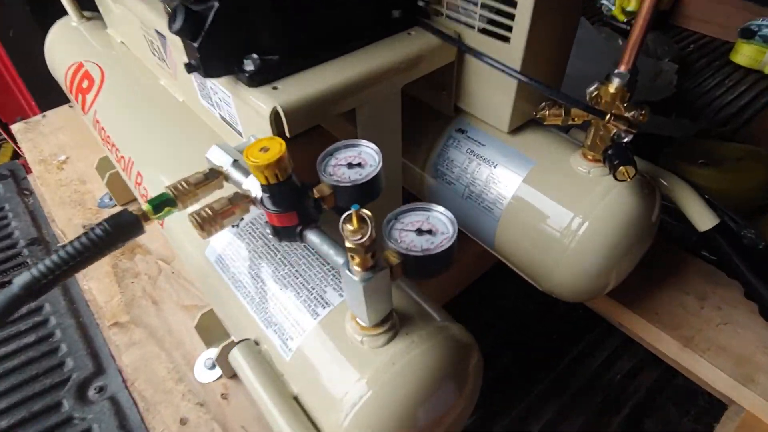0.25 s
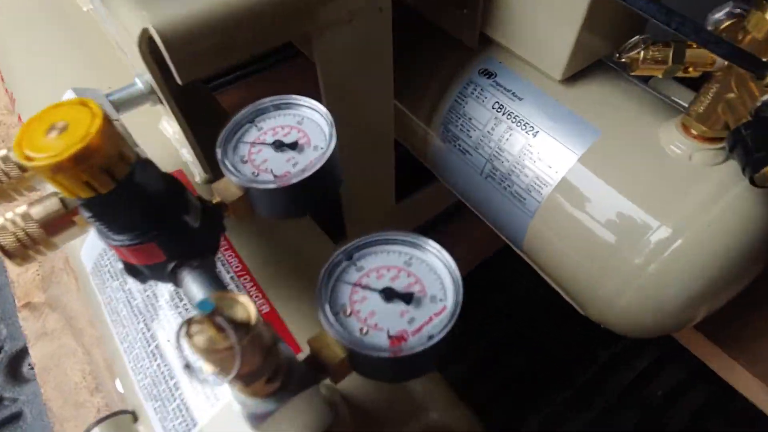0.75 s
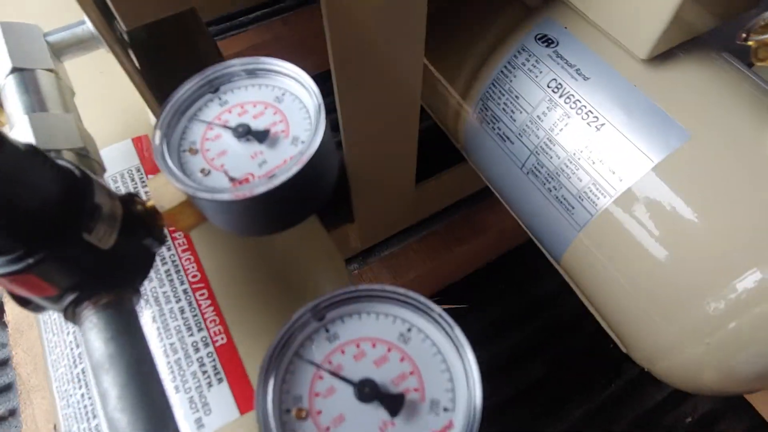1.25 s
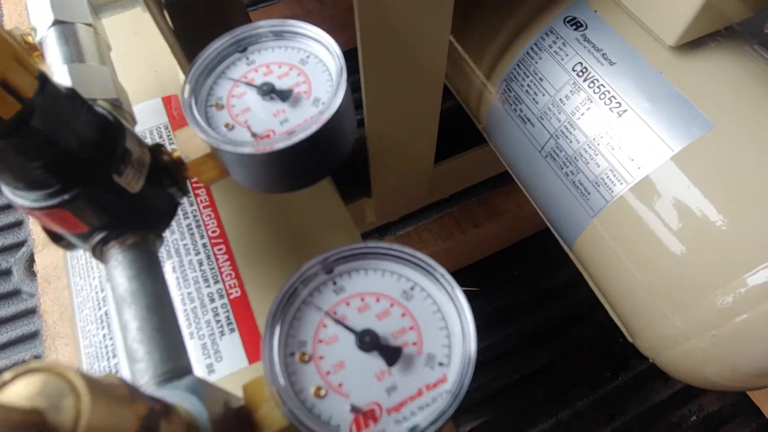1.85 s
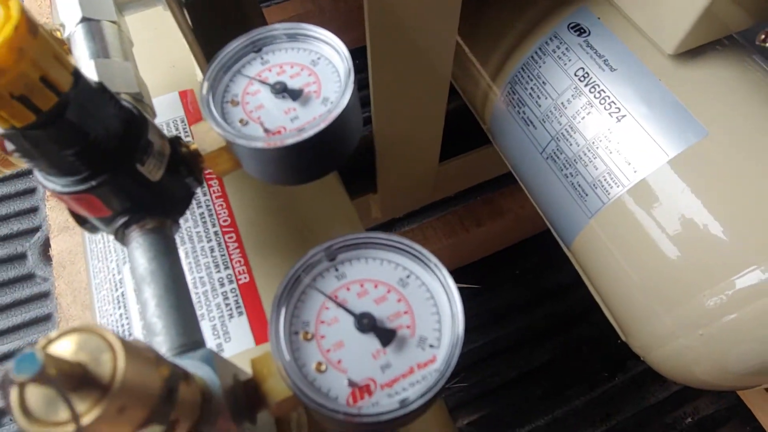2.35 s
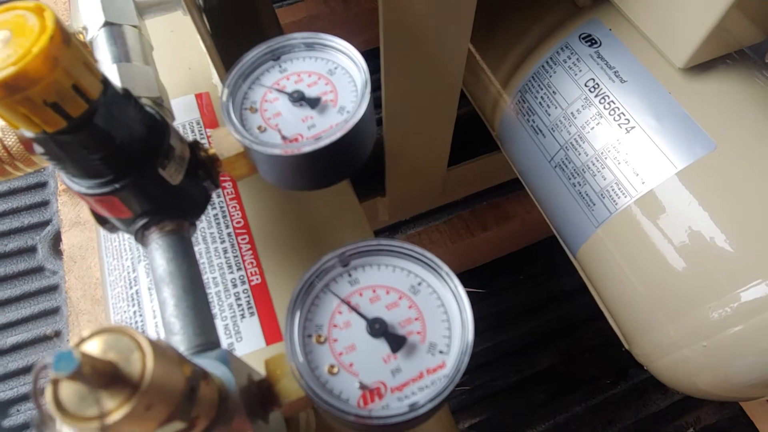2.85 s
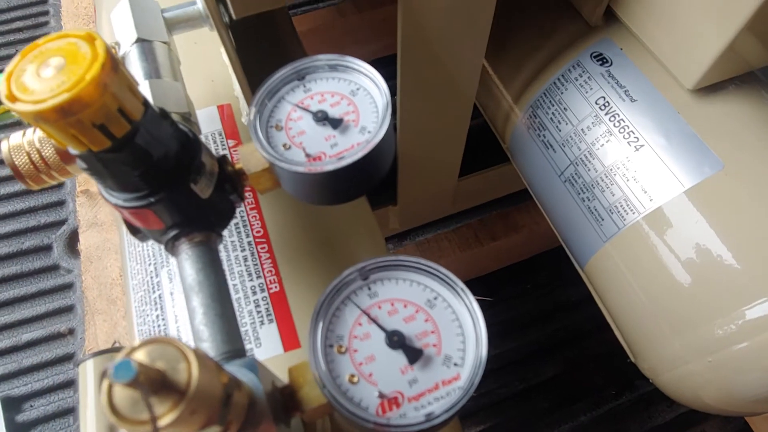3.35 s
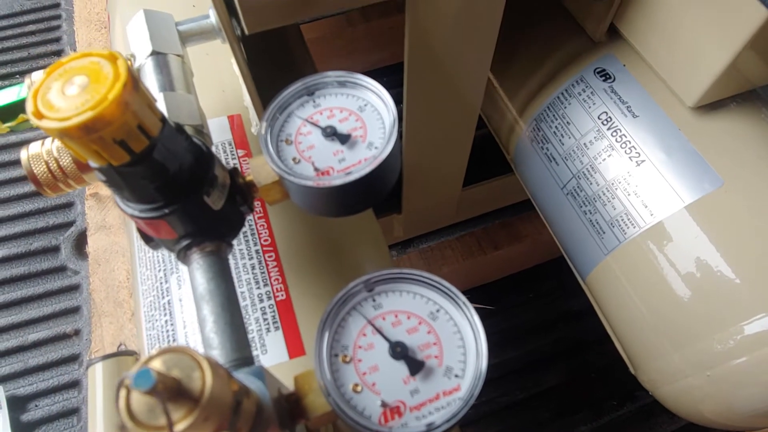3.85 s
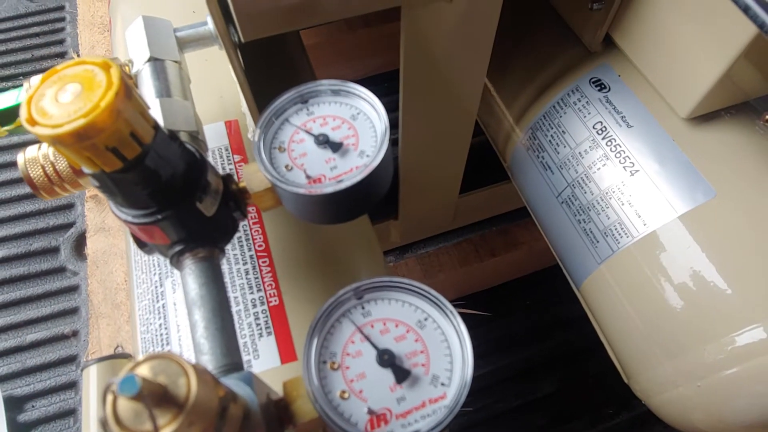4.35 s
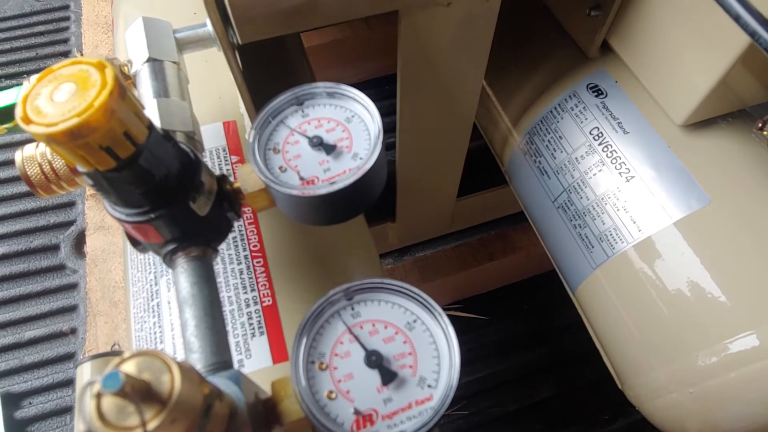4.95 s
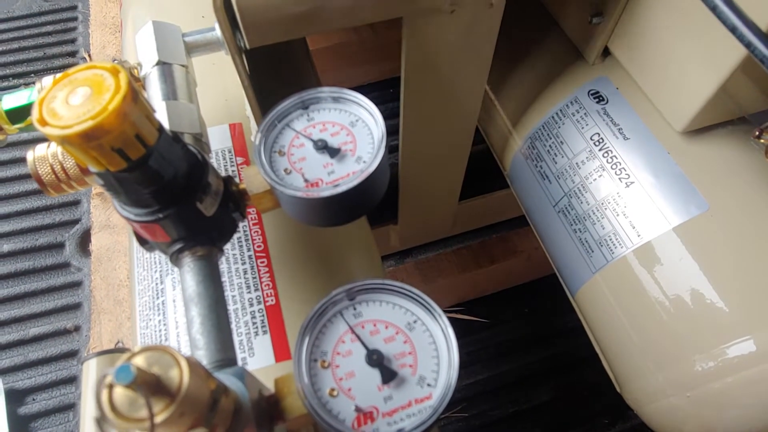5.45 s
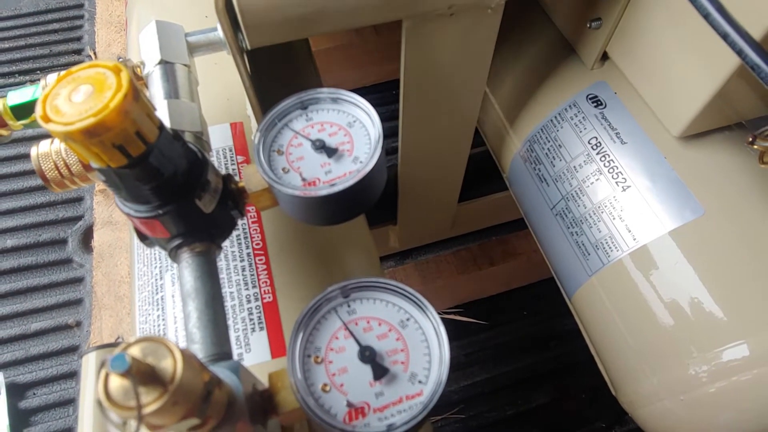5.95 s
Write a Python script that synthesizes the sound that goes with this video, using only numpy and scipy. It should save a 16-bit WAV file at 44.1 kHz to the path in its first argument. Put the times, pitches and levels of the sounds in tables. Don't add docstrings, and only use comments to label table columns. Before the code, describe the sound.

Loud, unbroken drone of a petrol-driven air compressor, rapid exhaust pulses and pump strokes beating together over roaring gas and harsh metallic clatter.

```python
import sys
import numpy as np
from scipy import signal
from scipy.io import wavfile
from scipy.ndimage import uniform_filter1d, minimum_filter1d

SR = 44100
rng = np.random.default_rng(int(sys.argv[2]) if len(sys.argv) > 2 else 0)


def convert_level_to_amplitude(level_db):
    exponent = np.asarray(level_db, float) / 20
    return 10 ** exponent


def put_to_file(sound):
    columns = np.atleast_2d(sound).T
    safe = np.clip(columns, -1, 1)
    whole_steps = np.round(safe * 32767)
    wavfile.write(sys.argv[1], SR, whole_steps.astype(np.int16))


N = 274302

STEP = 8
BELT = .736215


def evened(x):
    return x / np.sqrt(np.mean(x ** 2) + 1e-20)


def read(points, hz):
    f, value = np.transpose(points)
    return np.interp(np.log(hz + 1), np.log(f + 1), value)


def curve(rows):
    time_s, value = np.transpose(rows)
    return np.interp(np.arange(N) / SR, time_s, value)


def slow(rate_hz, count=N):
    knots = signal.resample(rng.standard_normal(60), 600)
    end = min(rate_hz * N / SR * 20, 599)
    return evened(np.interp(np.linspace(0, end, count), np.arange(600), knots))


def panned(pan_db):
    return convert_level_to_amplitude([[pan_db / 2], [-pan_db / 2]])


# (time [s], firing rate [1/s])
FIRING_RATE = [
    (0.0, 28.587),
    (0.4, 28.567),
    (1.0, 28.515),
    (1.75, 28.593),
    (3.15, 28.45),
    (4.0, 28.553),
    (5.2, 28.574),
    (6.22, 28.515),
]


def angles():
    firings = np.cumsum(curve(FIRING_RATE)) / SR
    return 2 * np.pi * (firings - .472), 2 * np.pi * (BELT * firings + .0775)


def shaft_beat(engine, pump):
    return 3 * engine - 4 * pump


def knock(engine, pump, fire_db, stroke_db):
    fire = np.exp(0.52 * (np.cos(engine + 5.84) - 1))
    stroke = np.exp(0.89 * (np.cos(2 * pump + 3.44) - 1))
    meeting_db = 6.3 * (fire * stroke - 0.2135)
    return convert_level_to_amplitude(fire_db * fire + stroke_db * stroke + meeting_db)


# (frequency [Hz], correlation [-1..1])
PORT_LIKENESS = [(60, 0.51), (140, 0.81), (330, 0.8), (500, 0.63), (770, 0.74), (1150, 0), (2000, 0)]


def shaped(drive, spectra, patchy_db):
    hz, _, (a, b) = signal.stft(drive, SR, nperseg=1024, noverlap=768)
    patches = uniform_filter1d(rng.standard_normal(a.shape), 12, axis=0)
    patches = evened(uniform_filter1d(patches, 14, axis=1))
    same = np.clip(read(PORT_LIKENESS, hz), -1, 1)[:, None]
    ports = np.array([a, same * a + np.sqrt(1 - same ** 2) * b])
    ports *= convert_level_to_amplitude(patchy_db * patches)
    ports *= convert_level_to_amplitude([read(s, hz) for s in spectra])[:, :, None]
    return signal.istft(ports, SR, nperseg=1024, noverlap=768)[1][:, :N]


# (frequency [Hz], left minus right [dB])
BASS_PAN = [(40, 4), (90, 4), (150, 2.5), (400, 0.5), (700, 2)]


def bass_pan_db(hz):
    return read(BASS_PAN, hz)


# (frequency [Hz], density [dB per Hz])
ROAR_SPECTRUM = [(25, -25), (50, -21), (80, -12), (130, -7), (250, -8), (500, -10), (900, -10)]


def roar(engine, pump):
    drive = rng.standard_normal((2, N)) * knock(engine, pump, fire_db=0.8, stroke_db=-1.06)
    left = list(ROAR_SPECTRUM) + [(1300, -35.5), (3000, -73)]
    right = [(hz, db - bass_pan_db(hz)) for hz, db in left]
    return convert_level_to_amplitude(3.5) * shaped(drive, [left, right], patchy_db=-0.5)


def blows(angle, uneven):
    hit = np.diff(np.floor(angle / (2 * np.pi)), prepend=0) > 0
    return evened(hit * (1 + uneven * rng.standard_normal(N)))


# (frequency [Hz], width [Hz], level [dB], left minus right [dB])
PANELS = [(751, 12, -29.5, -1), (1090, 30, -31, -1), (1135, 9, -38, 5), (1159, 7, -30, 3),
          (1205, 30, -34, 4),
          (1278, 14, -34, 1), (1370, 16, -38, 0), (1455, 25, -36, 5), (1630, 30, -34, -9),
              (1738, 30, -27.5, -6),
          (1810, 50, -36, -9), (1975, 30, -38, -8), (2148, 26, -32, -10), (2225, 18, -35.5, -9),
              (2375, 20, -42, -8), (2515, 20, -42, -4), (2883, 30, -34, 0),
          (2680, 40, -42, 2), (3290, 40, -43, 3), (3690, 40, -44, 3), (4190, 50, -45, 3),
               (4970, 50, -47, -2), (5230, 50, -46, 2), (6000, 60, -46, 2)]
# (time [s], lean [0-1])
LEAN = [
    (0.0, 0.05),
    (0.6, 0.46),
    (1.3, 1.0),
    (1.9, 0.9),
    (2.5, 0.7),
    (2.9, 0.25),
    (3.4, 0.4),
    (4.5, 0.2),
    (6.22, 0.0),
]


def panels(engine, pump):
    shake = rng.standard_normal((2, N)) * knock(engine, pump, fire_db=1.5, stroke_db=-4.5)
    drive = evened(shake) + 0.38 * blows(pump, uneven=0.11) + 0.37 * blows(engine + 5.55, uneven=0.34)
    drive = np.hstack([drive[:, -SR // 4:], drive])
    lean = curve(LEAN)
    guard = convert_level_to_amplitude(1.4 + 4 * lean + 0.7 * slow(3.0))
    shroud = convert_level_to_amplitude(5 - 6.5 * lean)
    tank = convert_level_to_amplitude(1.2 + 0.5 * lean + 0.63 * slow(1.44))
    out = np.zeros((2, N))
    for hz, width_hz, db, pan_db in PANELS:
        r = np.exp(-np.pi * 1.4 * width_hz / SR)
        mode = [1, 0, -1, 1, -2 * r * np.cos(2 * np.pi * hz / SR), r * r]
        a, b = signal.sosfilt([mode, mode], drive)[:, -N:]
        ring = evened(np.array([a, 0.45 * np.roll(a, -8) + 0.78 * b])) * convert_level_to_amplitude(db - 1)
        if hz < 900:
            part = tank
        elif hz < 1240 or 2800 < hz < 3000:
            part = guard
        elif 1600 < hz < 2300:
            part = shroud
        else:
            part = 1
        out += ring * panned(pan_db) * part
    return signal.sosfilt(signal.butter(10, 6800, fs=SR, output="sos"), out)


# (time [s], strength [dB])
JOLTS = [(0.07, 4.5), (0.56, 3), (0.64, 3), (0.74, 3.5), (1.16, 2.5), (1.24, 4.5), (1.41, 4.5), (1.69, 1.5),
         (1.76, 3.5), (1.98, 3.5), (2.06, 3), (2.2, 2), (2.35, 3.5), (2.49, 4), (2.81, 1.5), (3.16, 2),
         (3.39, 0), (3.53, 1.5), (3.62, 2), (3.83, 1), (3.9, 1), (4.15, 1), (4.27, 3), (4.49, 1.5),
         (4.58, 3.5), (4.64, 5.5), (5.24, 2.5), (5.67, 3), (5.79, 4), (6.04, 2)]


def rattle_db(engine, pump):
    t = np.arange(0, N + STEP, STEP) / SR
    rise_s, fall_s = 0.016, 0.016
    jolts = sum(db * np.exp(-abs(t - s) / np.where(t < s, rise_s, fall_s)) for s, db in JOLTS)
    beat = shaft_beat(engine, pump)
    slack = 0.33 * np.cos(beat - 3.6) + 0.16 * np.cos(2 * beat + 0.63)
    return np.repeat(jolts, STEP)[:N] + slack


def ticks(sizes, chosen, decay_s):
    return evened(signal.lfilter([1], [1, -np.exp(-1 / (decay_s * SR))], sizes * chosen))


# (frequency [Hz], density [dB per Hz])
CLATTER_LEFT = [(1100, -4.5), (1500, -9), (1700, -16.5), (2350, -16.5), (2900, -14.5), (4000, -15),
                (6000, -19), (7500, -23.5), (8600, -48), (9800, -27.5), (10300, -35), (11800, -25),
                (13100, -36), (15500, -47)]
CLATTER_RIGHT = [(1100, -9), (1400, -9.5), (1700, -4.5), (2200, -8), (2600, -9.5), (4000, -19.5),
                 (6200, -19.5), (7000, -8.5), (7700, -24), (8650, -68), (9700, -37.5), (11000, -30),
                 (13000, -34), (15500, -35)]


def clatter(engine, pump):
    sizes = convert_level_to_amplitude(2.6 * np.minimum(rng.exponential(1, N), 4))
    draw = rng.random(N)
    small = ticks(sizes, draw < 500 / SR, decay_s=.0018)
    large = ticks(sizes, draw < 30 / SR, decay_s=.006)
    noise = rng.standard_normal((2, N))
    noise[1] = 1.02 * noise[1] + 0.1 * np.roll(noise[0], -8)
    drive = noise * (1 + 0.2 * small + .17 * large) / 1.312
    effort = convert_level_to_amplitude(0.43 + rattle_db(engine, pump)) * knock(engine, pump, fire_db=-2.5, stroke_db=-3.5)
    ports = [[(500, -24.5), (850, -18.5)] + list(port) for port in (CLATTER_LEFT, CLATTER_RIGHT)]
    return convert_level_to_amplitude(4.5) * shaped(drive * effort, ports, patchy_db=0.74)


# (multiple of firing rate, level [dB])
EXHAUST = [(1, -41), (2, -36), (3, -21), (4, -30), (5, -27), (6, -20), (7, -33), (8, -30), (9, -34),
           (10, -34), (11, -35), (12, -32), (13, -34), (14, -36), (15, -43), (16, -39), (17, -36),
           (18, -44), (19, -41)]
# (multiple of pump shaft rate, level [dB])
INTAKE = [(2, -41), (3, -41), (4, -33), (6, -31), (8, -34), (10, -39), (11, -41), (12, -34), (14, -37),
          (15, -41), (16, -36), (17, -42), (18, -41), (19, -38), (20, -35), (22, -36), (23, -40), (24, -39),
          (25, -40), (26, -41), (27, -42), (28, -35), (29, -42), (30, -38), (31, -42), (32, -40), (36, -36),
          (41, -40), (54, -39), (55, -36)]
# (firing multiple, pump multiple, level [dB])
FRAME_SHAKE = [(1, 1, -52), (1, 2, -44), (1, 4, -48), (2, 1, -44), (2, 2, -24), (2, 3, -39), (2, 4, -37),
               (3, 2, -34), (3, 3, -43), (4, 1, -30), (4, 2, -34), (4, 4, -42), (5, -1, -42), (5, 1, -39),
               (5, 4, -43), (6, -2, -35), (6, -1, -42), (6, 2, -40), (6, 4, -42), (7, -1, -43), (7, 1, -38),
               (7, 2, -42), (7, 4, -42), (8, -1, -42), (9, -2, -43), (9, -1, -43), (9, 2, -42), (9, 3, -43),
               (9, 4, -43)]


def tones(engine, pump):
    rows = [(k, 0, db) for k, db in EXHAUST] + [(0, j, db) for j, db in INTAKE] + list(FRAME_SHAKE)
    engine, pump = engine[::STEP], pump[::STEP]
    count = len(engine)
    out = np.zeros((2, count))
    for k, j, db in rows:
        hz = (k + j * BELT) * FIRING_RATE[0][1]
        waver = min(.1 + hz / 500, 1)
        even = k % 2 == 0
        if k and j:
            lag_rad = 5.6 - 2.1 * even
        elif k:
            lag_rad = 5.68 + .7 * even
        else:
            lag_rad = 5.1
        lag_rad += .935 * (hz / 100) ** 2
        lag_rad += rng.uniform(-np.pi, np.pi) * np.clip((-db - 34) / 3, 0, 1)
        lag_rad = lag_rad + .5 * waver * slow(2.0, count)
        level = convert_level_to_amplitude(db + 2.5 * waver * slow(3.0, count))
        tone = np.sqrt(2) * level * np.cos(k * engine + j * pump - lag_rad)
        out += tone * panned(bass_pan_db(hz))
    return signal.resample_poly(out, STEP, 1, axis=1)[:, :N]


def scene():
    engine, pump = angles()
    high = panels(engine, pump) + clatter(engine, pump)
    low = roar(engine, pump) + tones(engine, pump)
    swell_db = 0.64 * np.cos(shaft_beat(engine, pump) + 0.33)
    combustion_db = 0.58 * slow(4.0)
    return convert_level_to_amplitude(swell_db + combustion_db) * low + high


def top_cut(x):
    return signal.sosfilt(signal.butter(12, 15800, fs=SR, output="sos"), x)


def record(dry):
    ceiling = 1.01
    need = np.minimum(1, (ceiling / (abs(dry).max(0) + 1e-9)) ** 0.89)
    hold = minimum_filter1d(need, size=61)
    hold = uniform_filter1d(uniform_filter1d(hold, size=31), size=31)
    return top_cut(dry * hold)


dry = scene()
out = record(dry)
put_to_file(out)
```